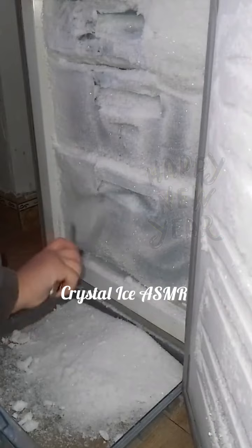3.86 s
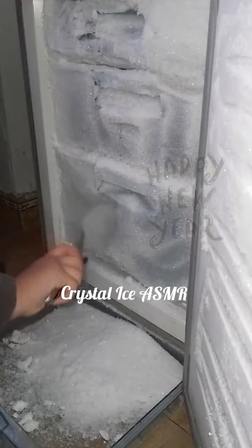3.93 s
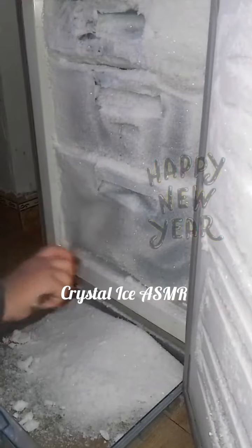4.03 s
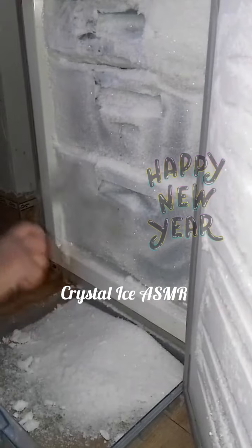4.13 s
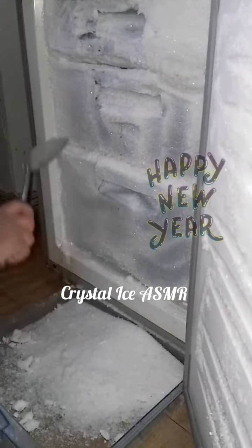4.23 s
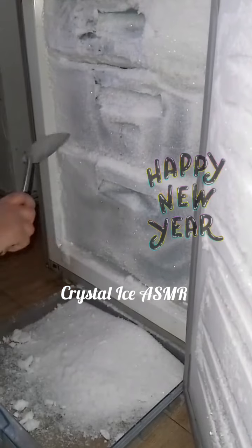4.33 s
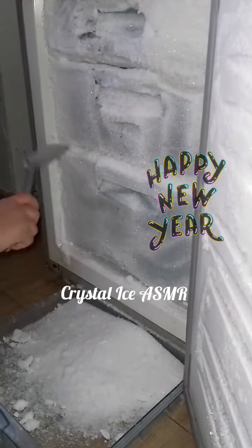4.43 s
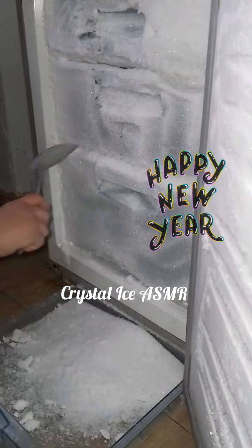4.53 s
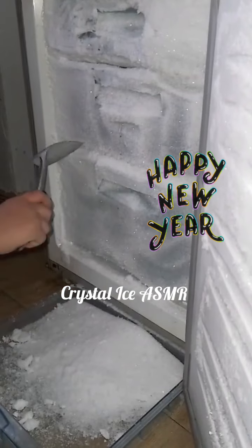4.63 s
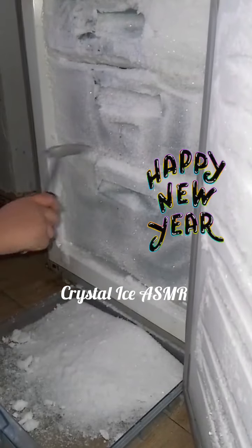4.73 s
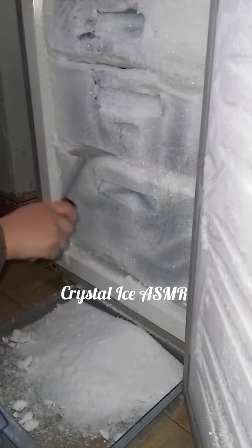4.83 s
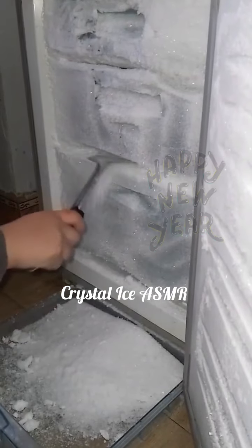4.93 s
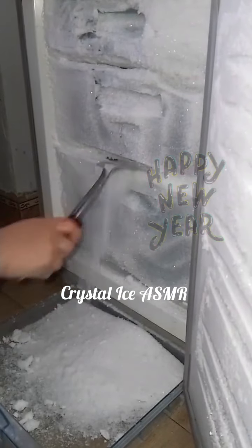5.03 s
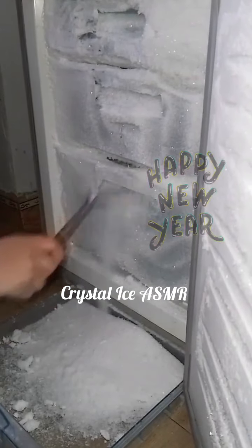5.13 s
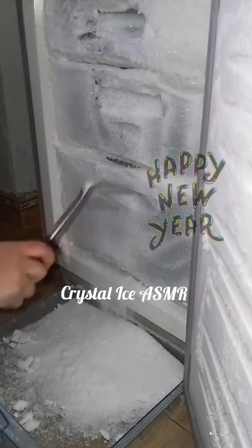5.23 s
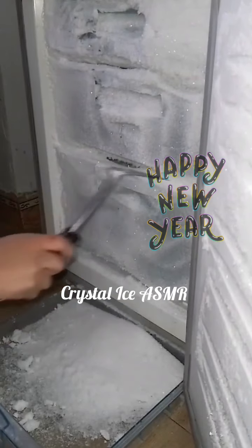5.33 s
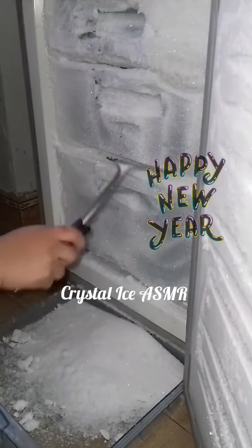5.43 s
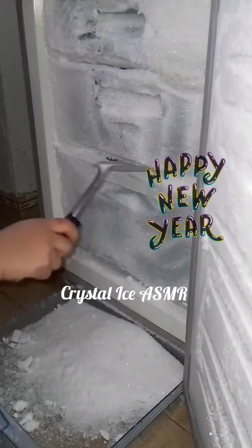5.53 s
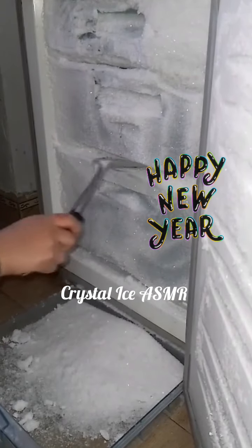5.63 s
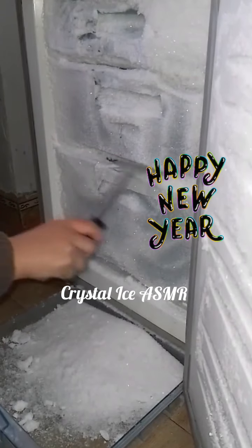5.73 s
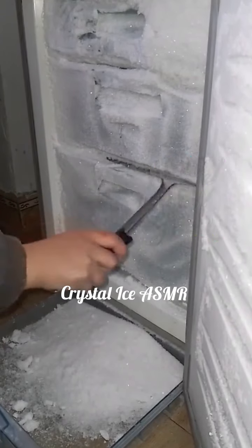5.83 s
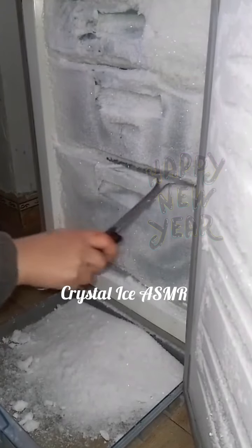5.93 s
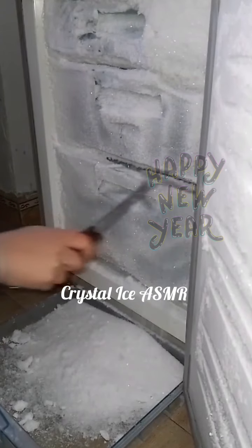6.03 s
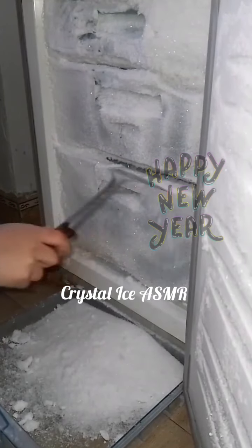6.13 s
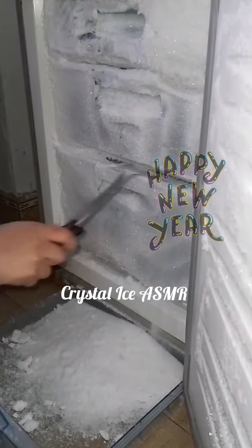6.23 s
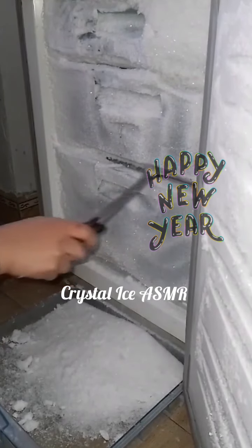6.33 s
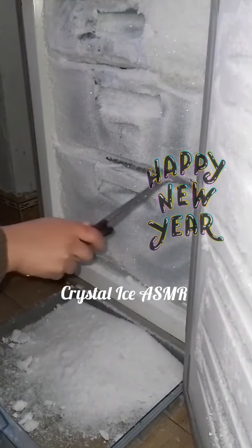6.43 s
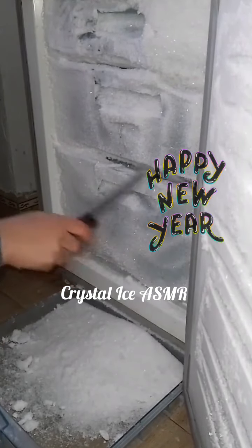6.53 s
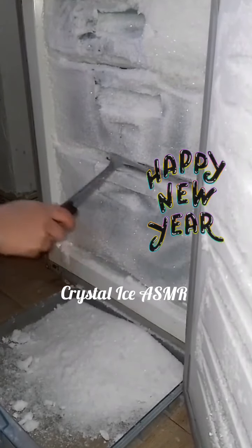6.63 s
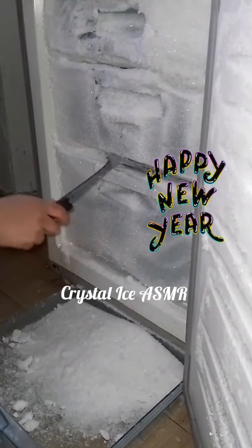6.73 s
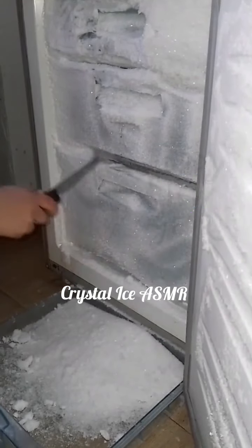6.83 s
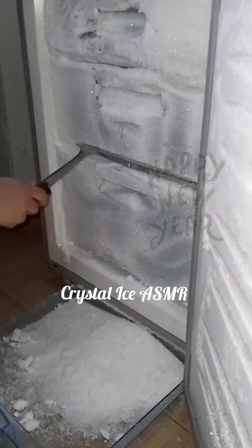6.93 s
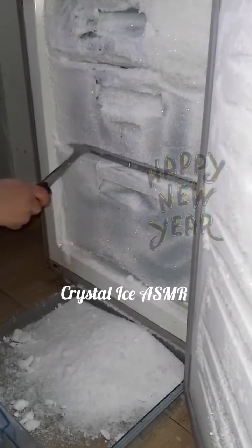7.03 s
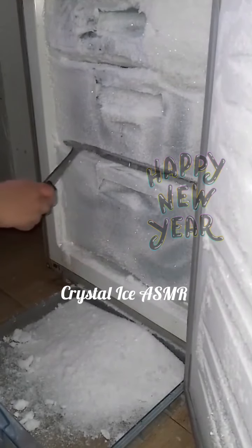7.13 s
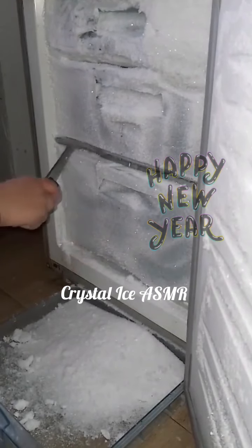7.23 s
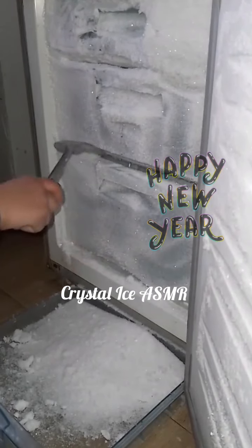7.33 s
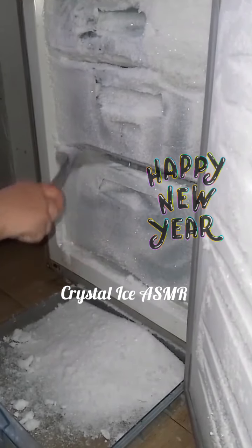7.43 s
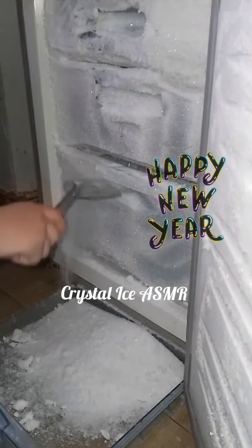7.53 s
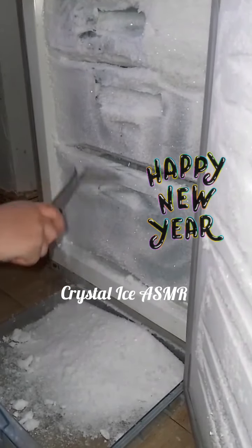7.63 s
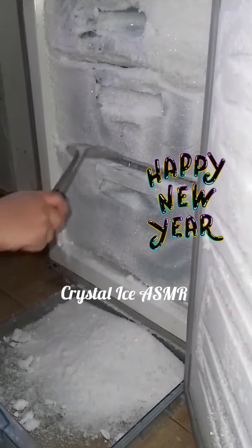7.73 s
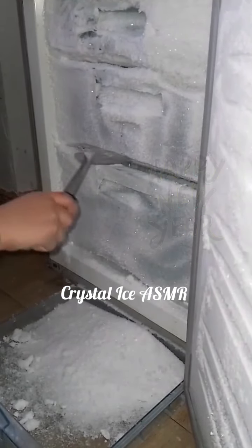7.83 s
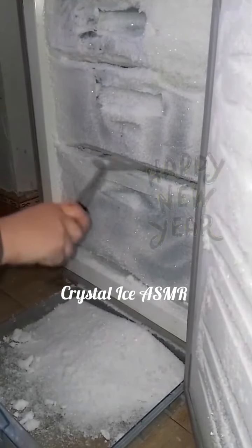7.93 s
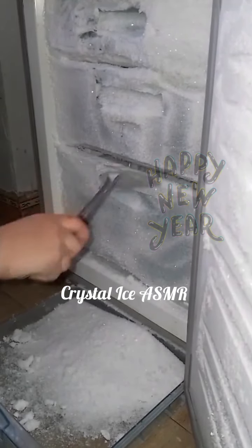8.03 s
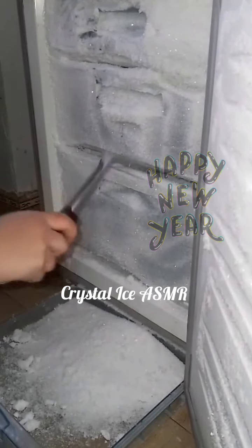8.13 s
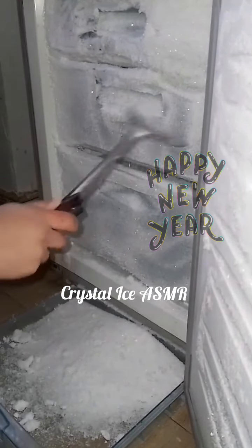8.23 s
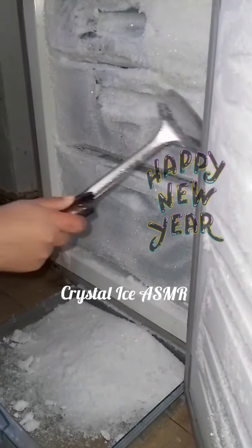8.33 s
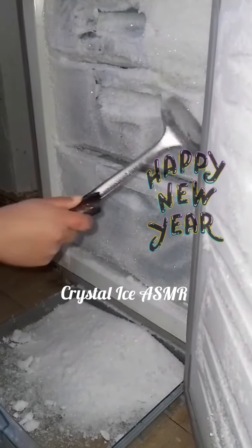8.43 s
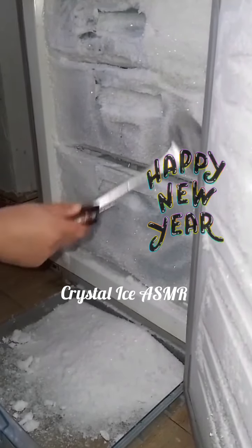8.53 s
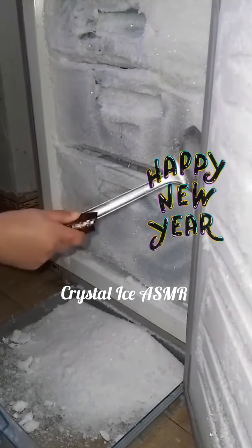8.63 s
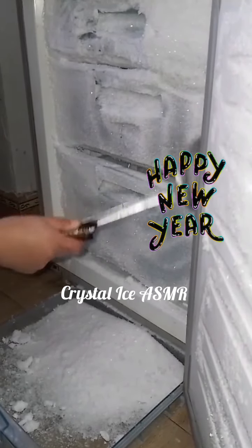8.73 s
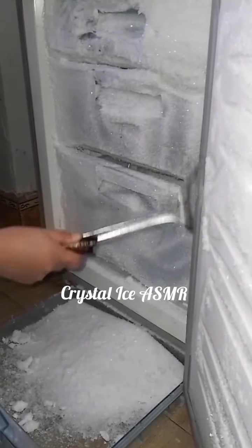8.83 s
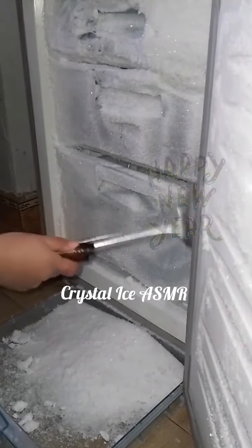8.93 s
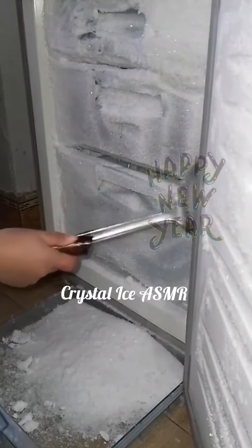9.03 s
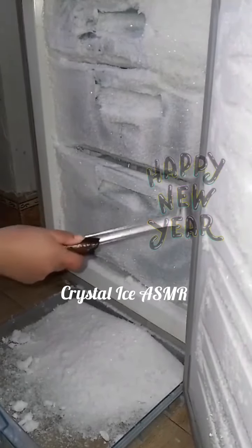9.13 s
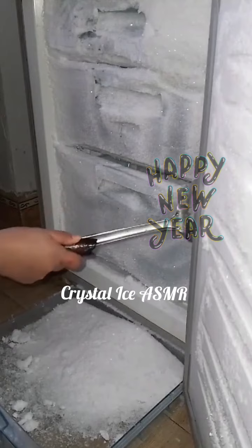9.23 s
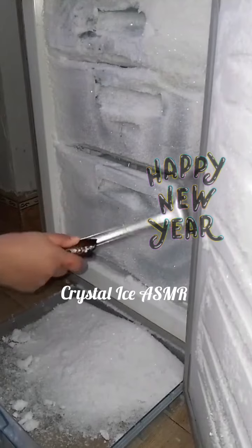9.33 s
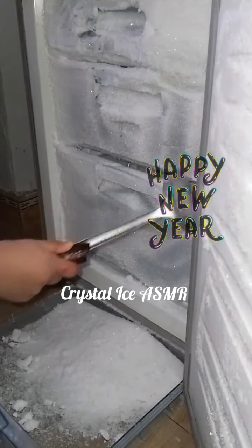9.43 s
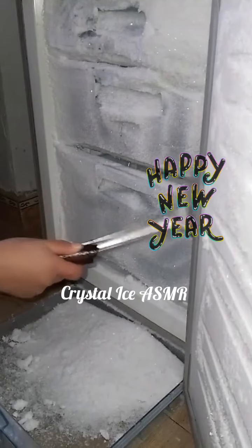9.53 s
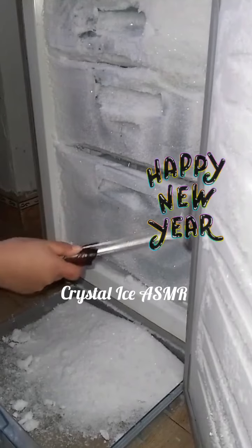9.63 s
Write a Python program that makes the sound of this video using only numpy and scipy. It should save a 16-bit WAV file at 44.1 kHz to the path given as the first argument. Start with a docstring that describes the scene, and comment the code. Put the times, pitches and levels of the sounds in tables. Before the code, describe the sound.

Crisp, crunching metal scrapes through thick frost, uneven strokes with hollow knocks and light bowl rings, brief near-silent gaps, close up in an echoing room.

```python
"""A bare, ringing room, its still air faintly hissing, with a steel ladle already scraping frost in an open freezer.
From 0.37 s the rim bites and knocks as strokes land; each stroke crushes thousands of crystals a second, which
drive resonances of rim, powder, bowl, handle and cabinet wall. From 1.05 s loosened frost sometimes patters down
as sparse filtered crumbs; two faint sine hums come at 3.3 and 3.95 s. Strokes and bites go on past 9.6 s.
A phone with two unlike microphone ports listens close by, ducks the quiet and clips the loudest peaks."""
import sys
import numpy as np
from scipy import signal
from scipy.fft import rfft, irfft, next_fast_len
from scipy.io import wavfile
from scipy.ndimage import uniform_filter1d

SR = 44100
rng = np.random.default_rng(int(sys.argv[2]) if len(sys.argv) > 2 else 0)


def wrap_up_sound(samples):
    """Save the sound to the file named by the first command line argument, as 16-bit audio."""
    columns = np.atleast_2d(samples).T
    # keep every value between -1 and 1, then stretch to whole-number steps
    tamed = np.clip(columns, -1, 1)
    steps = np.round(tamed * 32767).astype(np.int16)
    wavfile.write(sys.argv[1], SR, steps)


N = 426888

LEAD = .3  # s of scraping before the first sample, whose echo is still in the air
START = round(LEAD * SR)
M = N + START


def amp(db):
    """Decibels to linear gain."""
    return 10 ** (np.asarray(db) / 20)


def unit(x):
    """Scaled to an RMS of one."""
    return x / np.sqrt(np.mean(np.abs(x) ** 2) + 1e-20)


def along(points, hz):
    """A curve through (f/Hz, value) points, straight on a log frequency axis."""
    f, value = np.transpose(points)
    return np.interp(np.log(hz + 1), np.log(f + 1), value)


def filtered(x, response):
    """x times a complex response of frequency, padded so that the ring does not wrap round at once."""
    m = next_fast_len(x.shape[-1] + SR // 4)
    spectrum = rfft(x, m) * response(np.fft.rfftfreq(m, 1 / SR))
    return irfft(spectrum, m)[..., :x.shape[-1]]


def body(modes):
    """A causal bank of damped resonances that passes white noise at unchanged power."""
    def response(f):
        return unit(sum(amp(db) * 1j * f * w / (c * c - f * f + 1j * f * w) for c, w, db in modes))
    return response


def laid(rows, edge_s):
    """A table of (t/s, level/dB, ..) as gains at each sample, faded in and out at its ends."""
    t = np.arange(M) / SR - LEAD
    s, *levels = np.transpose(rows)
    touch = np.clip(np.minimum(t - s[0], s[-1] - t) / edge_s + .5, 0, 1)
    here = np.flatnonzero(touch)
    gain = np.zeros((len(levels), M))
    gain[:, here] = touch[here] * amp([np.interp(t[here], s, db) for db in levels])
    return gain


# pushes of the rim through the frost, levels ahead of the part faders:
# (t/s, swell/s, hold/s, fade/s, crunch level/dB, then powder, bowl, handle and wall level/dB re crunch)
PUSHES = [(-.28, 0, 0.0031, .2, 4.5, -2.5, -12.5, -16, -11),
          (0.41, 0, 0.0073, 0.031, -25, -22, 1.5, -24, 2.5),
          (.45, 0.11, 0.11, 0.037, -22, -10, -11.5, -18, -23),
          (0.689, 0.0076, 0.14, 0.093, -10.5, -7.5, -14.5, -16.5, -21),
          (0.85, 0, 0.11, 0.067, -13.5, -4, -10.5, -22, -12.5),
          (1.418, 0.02, 0, 0.034, -15.5, -7.5, -10, -14.5, -14.5),
          (1.464, 0.15, 0.098, 0.085, -11, -5.5, -8.5, -10.5, -13),
          (2.088, 0.062, 0.0079, 0.0082, -15.5, -8.5, -13.5, -10.5, -9.5),
          (2.257, 0.065, 0.077, 0.067, -11.5, -5, -12, -15, -17),
          (2.636, 0.021, 0.000046, 0.017, -26, -2.5, -4.5, -3.5, -11),
          (2.691, 0, 0.22, 0.11, -15, -7.5, -13, -18.5, -16),
          (3.196, 0.032, 0.043, 0.045, -14, -7.5, -11.5, -18.5, -11.5),
          (3.648, 0.012, 0.015, 0.013, -18.5, -10, -31, -7.5, -10.5),
          (3.694, 0.044, 0.2, 0.082, -11.5, -7, -12, -14.5, -17),
          (4.509, 0, 0.00083, 0.02, -18, -7, -10.5, -11, -14.5),
          (4.52, 0.0093, 0.11, 0.012, -30, -22, -24, -14, -10.5),
          (4.604, 0, 0.011, 0.0062, -11, -12.5, -41, -15.5, -24.5),
          (4.62, 0, 0.023, 0.27, -32, -5, -15, -23, -15),
          (4.751, 0.0061, 0.069, 0.028, -14, -11, -19.5, -16, -18.5),
          (4.755, 0.16, 0.21, 0.012, -14, -5, -14, -17.5, -22),
          (5.475, 0.015, 0.012, 0.094, -24, -8.5, -17, -15.5, -30),
          (5.586, 0.028, 0.06, 0.0087, -21, -8, -13.5, -16.5, -11.5),
          (5.689, 0.042, 0.13, 0.023, -13.5, -9, -11, -13, -15),
          (5.853, 0, 0.01, 0.2, -24, -18.5, 2, 3.5, 3),
          (5.959, .17, 0.000037, 0.012, -12, -7, -13, -23.5, -38),
          (6.365, 0.13, 0, 0.0082, -28, -1.5, -21, -13, -7),
          (6.481, 0.064, 0.038, 0.066, -12, -9.5, -11, -17.5, -21.5),
          (6.67, 0.038, 0.052, 0.21, -20.5, -5, -13, -16, -17),
          (6.808, 0.095, 0.00022, 0.16, -15.5, -11, -5.5, -18, -15),
          (7.041, 0.029, 0.062, 0.033, -17.5, -15, -3.5, -21, -12.5),
          (7.17, 0.074, 0.087, 0.0095, -26, -7, -1.5, -25, -4.5),
          (7.24, 0.066, 0.13, 0.079, -13, -6.5, -14.5, -19.5, -22),
          (7.801, 0.0077, 0.049, 0.011, -31.5, -10.5, -34, -13, -44),
          (7.878, 0.05, 0.014, 0.016, -16, -10, -9.5, -25, -9),
          (7.938, 0.048, 0.03, 0.035, -16, -4.5, -11.5, -16, -28.5),
          (8.501, 0.028, 0.089, .01, -18.5, -8, -12.5, -21.5, -19.5),
          (8.588, 0.021, 0.036, 0.0053, -17, -33, -9, -17.5, -11),
          (8.649, 0.15, 0.14, 0.015, -16.5, -7.5, -11.5, -21, -21.5),
          (9.158, 0.0017, 0.032, 0.084, -17, -10.5, -7, -11.5, -8.5),
          (9.288, 0.069, 0, 0.077, -14, -7, -8, -19.5, -15),
          (9.411, 0.0027, 0, 0.0059, -19.5, -7, -2, -10, -14.5)]
# bites of the rim into the crust, levels ahead of the faders:
# (t/s, crunch level/dB, clang level of bowl and handle/dB re crunch, t60/s, knock level/dB, knock f/Hz)
CRUST_BITES = [(0.3721, -34, 3.5, 0.041, -29, 506), (0.409, -12.5, -12, 0.062, -18, 480),
               (0.414, -24, -12, 0.037, -14.5, 1330), (0.437, -30, -12, 0.03, -20, 500),
               (0.442, -33, -10, 0.04, -25, 1310), (0.477, -29, -16, 0.036, -25, 446),
               (0.52, -32, -15, 0.048, -22.5, 402), (0.692, -17, -26, 0.1, -59, 640),
               (0.851, -29, -6, 0.046, -7, 1140), (0.977, -21, -1, 0.032, -21, 2230),
               (1.434, -23, -13, 0.075, -27, 339), (2.098, -15, -5.5, 0.17, -45, 495),
               (2.6941, -15.5, 0, 0.045, -21, 480), (3.1253, -13, -5, 0.083, -32, 490),
               (3.1971, -7, -9.5, 0.11, -1, 290), (3.6521, -18, -25.5, 0.09, -31, 610),
               (4.5105, -35, -14, 0.063, -35, 493), (4.605, -25, -28, 0.061, -43, 517),
               (4.7516, -16, -10, 0.098, -41, 288), (5.488, -18, -28, 0.074, -35, 480),
               (5.588, -18, -18, 0.1, -36, 517), (5.858, -9, 3, 0.064, -8, 337),
               (5.865, -19, -1, 0.043, -17, 905), (5.892, -26, -8, 0.05, -10.5, 620),
               (6.38, -21.5, -24, 0.113, -29.5, 372.3), (6.4313, -20, -15, 0.28, -42, 587),
               (6.553, -9.5, -27, 0.051, -35, 340), (6.895, -25, 4, 0.042, -11, 2100),
               (7.0996, -7.5, -8, 0.025, -17.5, 337), (7.812, -15, -35, 0.096, -47.5, 388),
               (7.8732, -8.5, -14.5, 0.08, -8.5, 270), (7.881, -13, -1, 0.045, -15.5, 483),
               (7.893, -28, -12, 0.05, -19, 617), (8.477, -46, -29, 0.041, -65.5, 393),
               (8.508, -26, -15, 0.06, -41, 380), (8.5203, -30, -25, 0.098, -58, 330),
               (9.109, -13, -9, 0.051, -19.5, 420), (9.1576, -7, -20, 0.075, -36, 500),
               (9.165, -27, -10, 0.059, -17, 378), (9.3318, -14, -18, 0.081, -37, 415),
               (9.5782, -4, -14, 0.027, -15, 422), (9.579, -19, -5, 0.0346, -12, 2200),
               (9.6429, -10.5, -14, 0.1, -19, 413), (9.653, -23.5, -12, 0.073, -13, 280)]
SWELL_DB, FADE_DB, LEAN_DB_PER_S = 12, 10.5, 1  # a push swells, fades, and leans in harder while it holds
BITE_POWDER_DB, BITE_HANDLE_DB = -11.5, 1.5  # re crunch; re clang


def effort(lift_s, rise_s):
    """Gain of crunch, powder, bowl, handle and wall: pushes between lifts, with sharp decaying bites on top."""
    power = np.zeros((5, M))
    for s, swell, hold, fade, db, *shares_db in PUSHES:
        times = s + np.cumsum(np.abs([0, swell, hold, fade]))
        start_db = db - SWELL_DB * (swell > 0)
        end_db = db + LEAN_DB_PER_S * abs(hold)
        faded_db = end_db - FADE_DB * min(fade / lift_s, 1)
        crunch, = laid(np.transpose([times, [start_db, db, end_db, faded_db]]), lift_s)
        here = np.flatnonzero(crunch)
        power[:, here] += (amp([0, *shares_db])[:, None] * crunch[here]) ** 2
    u = np.arange(SR // 5) / SR
    for s, db, clang_db, t60, _, _ in CRUST_BITES:
        shape = amp(db - 60 * u / max(t60, .01)) * (1 - np.exp(-u / rise_s))
        part = power[:4, START + round(s * SR):][:, :len(u)]  # all but the wall
        shares = amp([0, BITE_POWDER_DB, clang_db, clang_db + BITE_HANDLE_DB])
        part += (shares[:, None] * shape[:part.shape[1]]) ** 2
    return np.sqrt(power)


def crystals(rate, spread_db, judder_db):
    """Two streams of crystals of mixed sizes breaking at random; the edge judders, so both clump together."""
    hit = rng.random((2, M)) < rate / SR
    size = amp(spread_db * rng.exponential(size=(2, M))) * rng.standard_normal((2, M))
    judder = unit(uniform_filter1d(uniform_filter1d(rng.standard_normal(M), 250), 250))
    return unit(hit * size * amp(judder_db * judder))


# the mode each part favours from stroke to stroke, as the point of contact and the grip change:
# (from t/s, wall f/Hz, handle f/Hz, bowl f/Hz, rim f/Hz)
FAVOURED_MODES = [(0, 460, 1160, 2160, 7830), (0.37, 357, 1290, 2300, 5770), (0.68, 588, 1130, 2220, 7300),
                  (0.85, 533, 1150, 2200, 7930), (1.42, 485, 1190, 2060, 8200),
                  (2.09, 465, 1210, 1810, 8800), (2.26, 466, 870, 2020, 7860),
                  (2.69, 319, 1140, 2200, 5900), (3.12, 357, 1240, 2260, 8030),
                  (3.65, 558, 1190, 1960, 6530), (4.5, 495, 1147, 1900, 8030),
                  (4.75, 493, 1154, 1960, 8240), (5.48, 520, 1150, 1900, 6800),
                  (5.69, 477, 840, 2120, 6900), (5.855, 670, 960, 1690, 7830),
                  (5.98, 340, 1430, 2150, 6900), (6.37, 243, 1160, 2000, 7040),
                  (6.67, 383, 1160, 1910, 6440), (6.81, 455, 840, 2000, 7340), (7.04, 336, 820, 2380, 7000),
                  (7.13, 300, 950, 1850, 6810), (7.24, 517, 1160, 2000, 8260), (7.8, 470, 840, 1810, 8240),
                  (8.5, 342, 1180, 2120, 7940), (8.7, 366, 1200, 2270, 8100), (9.1, 413, 1254, 2300, 8150),
                  (9.29, 428, 1310, 2240, 7950), (9.381, 428, 1000, 2370, 8140),
                  (9.45, 400, 1200, 1950, 8100), (9.57, 412, 1260, 2170, 7600)]


def shifting(x, depth_db, bins, frames):
    """The point of contact wanders: bands swell and sink on their own, and one mode of four parts stands out."""
    favour_db, favour_octaves = (8, 6.7, 5.3, 4.6), (0.12, 0.043, 0.069, 0.015)  # lift and width, wall to rim
    hz, t, z = signal.stft(x, SR, nperseg=512)
    field = rng.standard_normal(z.shape[1:])
    for _ in range(2):
        field = uniform_filter1d(field, max(round(bins), 1), 0)
        field = uniform_filter1d(field, max(round(frames), 1), 1)
    s, *pitches = np.transpose(FAVOURED_MODES)
    stroke = np.maximum(np.searchsorted(s, t - LEAD) - 1, 0)
    lift_db = 0
    for pitch, db, octaves in zip(pitches, favour_db, favour_octaves):
        distance = np.log2((hz[:, None] + 1) / pitch[stroke])
        lift_db = lift_db + db * np.exp(-(distance / octaves) ** 2)
    return signal.istft(z * amp(depth_db * unit(field) + lift_db), nperseg=512)[1][:, :M]


# ringing modes of the ladle's rim: (f/Hz, width/Hz, relative level/dB)
RIM_MODES = [(4580, 40, -1.5), (5140, 38, -1), (5990, 37, 2), (6560, 33, 0), (7090, 2270, -1),
             (7780, 35, -1), (8000, 50, -2), (8250, 60, -2), (8820, 140, 1)]
# bright bands of the crushed powder: (f/Hz, width/Hz, relative level/dB)
POWDER_BANDS = [(10820, 350, -2), (11260, 140, 1), (11770, 240, 0), (12900, 2600, 0.96)]
# ringing modes of the ladle's bowl: (f/Hz, width/Hz, relative level/dB)
BOWL_MODES = [(1920, 55, 4), (1840, 26, -3), (2070, 57, 5.5), (2210, 68, 2), (2388, 58, -5),
              (2030, 1100, -6), (3040, 46, 4.5), (3486, 150, 0), (3816, 23, 4)]
# ringing modes of the ladle's handle: (f/Hz, width/Hz, relative level/dB)
HANDLE_MODES = [(836.4, 13, 3.5), (882, 28, -7), (945, 22, -1.5), (1023, 34, 3.5), (1152, 63, 4),
                (1297, 34, -13.5), (1326, 28, -2.5), (1264, 310, -0.5)]
# low modes of the cabinet wall: (f/Hz, width/Hz, relative level/dB)
WALL_MODES = [(256, 30, -3.5), (308, 30, -1.5), (354, 25.4, 1), (480, 850, -6.5), (418, 13.3, -2.5),
              (479.7, 27.5, 2), (540, 7.7, -9), (620, 17, 2), (706, 29, -7.5)]


def scraping():
    """Breaking crystals drive five resonant parts, each with its own share of the effort."""
    crunch, powder, bowl, handle, wall = effort(lift_s=.02, rise_s=.0015)
    wall = np.abs(uniform_filter1d(wall, 1500))  # the heavy panel follows the push slowly
    rim_hits = crunch * crystals(6000, spread_db=1.0, judder_db=1.0)
    powder_hits = powder * crystals(6800, spread_db=1.5, judder_db=-1.5)
    bowl_hits = bowl * crystals(3000, spread_db=2.0, judder_db=2.0)
    handle_hits = handle * crystals(3000, spread_db=2.0, judder_db=2.5)
    wall_hits = wall * crystals(3000, spread_db=3.0, judder_db=2.5)
    sound = (amp(-3.5) * filtered(rim_hits, body(RIM_MODES))
             + amp(2.0) * filtered(powder_hits, body(POWDER_BANDS))
             + amp(-2.0) * filtered(bowl_hits, body(BOWL_MODES))
             + amp(-1.5) * filtered(handle_hits, body(HANDLE_MODES))
             + amp(-3.5) * filtered(wall_hits, body(WALL_MODES)))
    return shifting(sound, depth_db=4, bins=2, frames=8)


# decay of the bare room, as the slope of a tail cut off at 0.75 s: (f/Hz, t60/s)
ROOM_DECAY = [(200, 1), (500, 0.98), (1500, 0.78), (4000, 0.68), (8000, 0.51), (13000, 0.27)]


def room(x, step=SR // 3, gap=300):
    """Noise tails, each band dying at its own speed; the ladle moves, so the echo pattern keeps changing."""
    out = np.zeros((2, M + 2 * SR))
    fade = np.hanning(2 * step)  # overlapping pieces crossfade
    for a in range(0, M, step):
        hz, t, z = signal.stft(rng.standard_normal((2, SR * 3 // 4)), SR, nperseg=256)
        t60 = along(ROOM_DECAY, hz)[:, None]
        z = z * amp(-60 * t / t60) * np.sqrt(.1 / t60)  # like energy in all bands
        tail = signal.istft(z, SR, nperseg=256)[1]
        piece = x[:, a:a + 2 * step]
        wet = signal.fftconvolve(piece * fade[:piece.shape[1]], tail / np.linalg.norm(tail[0]), axes=1)
        out[:, a + gap:a + gap + wet.shape[1]] += wet
    return out[:, :M]


# colour of the still room: (f/Hz, relative level/dB per Hz)
HUSH_COLOUR = [(25, -8), (80, -20), (150, -6), (500, 0), (2000, -10), (8000, -22), (15000, -38)]


def still_room():
    """Steady coloured noise, unrelated left and right."""
    noise = rng.standard_normal((2, N))
    return amp(-71.0) * unit(filtered(noise, lambda hz: amp(along(HUSH_COLOUR, hz))))


def knocks():
    """Each bite thumps wall, handle and bowl; the modes nearest the pitch of the spot ring hardest."""
    out = np.zeros((2, M + SR))
    u = np.arange(SR // 5) / SR
    narrow = [m for m in WALL_MODES + HANDLE_MODES + BOWL_MODES if m[1] < 150]
    hz, width, level = np.transpose(narrow)[:, :, None]
    modes = np.exp(-np.pi * width * u) * np.sin(2 * np.pi * hz * u) * (1 - np.exp(-u / 0.0022))
    scatter_db = rng.normal(0, 2.6, (len(CRUST_BITES), 2, len(modes)))
    for (s, *_, db, spot_hz), chance_db in zip(CRUST_BITES, scatter_db):
        near_db = np.maximum(-40 * np.abs(np.log2(hz[:, 0] / spot_hz)), -26)
        gains = amp(db + level[:, 0] + near_db + chance_db)
        out[:, START + round(s * SR):][:, :len(u)] += gains @ modes
    return out[:, :M]


# loosened frost sifting down after a stroke: (t/s, level/dB ahead of the fader)
FROST_FALLS = [(1.8, -20), (1.05, -38), (4.02, -44.5), (5.2, -24.5), (6.2, -25), (7.558, -29.5),
               (8.099, -45), (9.002, -48)]
FALL_S, DWINDLE_DB = 0.34, 24  # how long a fall lasts, how far it thins out


def sifting():
    """Sparse crumbs of frost patter on the heap below, each fall dwindling in level."""
    flow = sum(laid([(s, db), (s + FALL_S, db - DWINDLE_DB)], 0.033)[0] for s, db in FROST_FALLS)
    crumbs = crystals(1200, spread_db=3, judder_db=3)
    return amp(-10.5) * filtered(flow * crumbs, body([(6000, 6000, -4.0), (12500, 4100, 22)]))


# a faint low hum that comes and goes: (start t/s, end t/s, RMS level/dB ahead of the phone, f/Hz)
LOW_HUMS = [(3.3, 3.656, -63, 114), (3.947, 4.745, -65, 151)]


def hum():
    """Soft low sine tones, the same at both ports."""
    t = np.arange(N) / SR
    tones = 0
    for start, end, db, hz in LOW_HUMS:
        gain = laid([(start, db), (end, db)], 0.055)[0, START:]
        tones = tones + gain * np.sqrt(2) * np.sin(2 * np.pi * hz * t)
    return tones


# tone of the left microphone port: (f/Hz, level/dB)
LEFT_PORT = [(25, -23.5), (90, -8), (170, -6), (215, 1), (1500, -1.5), (5400, 0), (6600, 6), (8000, -1.5),
             (9300, -4.5), (11500, -7), (13000, 1.5), (15500, 1)]
# tone of the right microphone port: (f/Hz, level/dB)
RIGHT_PORT = [(25, -16), (90, -8.5), (170, -10.5), (215, 2), (1500, -3), (5400, -1), (6600, -3), (8000, 6),
              (9300, -2), (11500, -9.5), (13000, -7), (15500, -13)]
# how alike left and right are: (f/Hz, likeness from 0 to 1)
LIKENESS = [(60, 0.83), (180, 1), (540, 0.75), (1640, 0.26), (4950, 0), (14900, 0)]


def ports(pair, lag_s=.0001):
    """Two streams become left and right: alike in the bass, unrelated in the treble; left hears late."""
    def blend(hz):
        turn = np.arccos(np.clip(along(LIKENESS, hz), -1, 1)) / 2
        return np.array([np.cos(turn), np.sin(turn)])

    def tone(hz):
        late = np.exp(np.outer([-1, 1], 1j * np.pi * hz * lag_s))  # half the lag each way
        return amp([along(LEFT_PORT, hz), along(RIGHT_PORT, hz)]) * late

    mid, side = filtered(pair, blend)
    return filtered(np.array([mid + side, mid - side]), tone)


def scene():
    """The ladle and its echo through the ports, over the still room and the hum."""
    near = scraping() + knocks() + sifting()
    hush = still_room()
    heard = ports(amp(-0.5) * near + amp(-0.5) * room(near))
    return heard[:, START:] + hush + hum()


def record(dry, gate_db=-52, slope=0.97, top_hz=15560):
    """The phone turns down what sinks under a threshold, clips near full scale and cuts all above its band."""
    level = np.sqrt(np.abs(uniform_filter1d(np.mean(dry ** 2, 0), 1300)) + 1e-12)
    gated = dry * np.minimum(level / amp(gate_db), 1) ** slope
    clipped = gated / (1 + np.abs(gated / 1.02) ** 14) ** (1 / 14)
    return filtered(clipped, lambda hz: np.clip((top_hz - hz) / 60, 0, 1))


dry = scene()
out = record(dry)
wrap_up_sound(out)
```